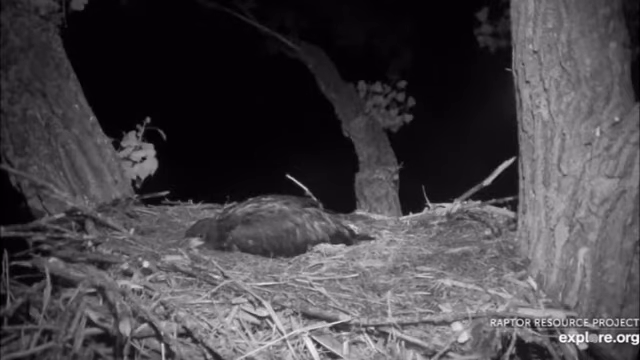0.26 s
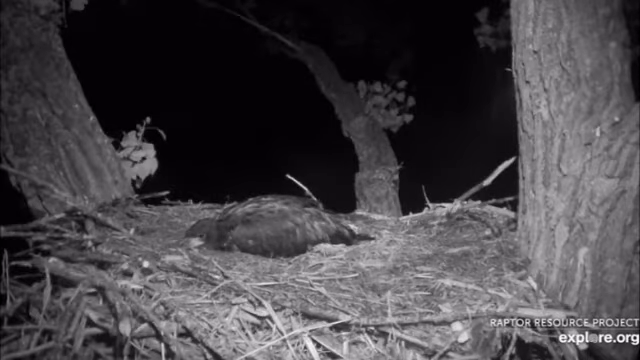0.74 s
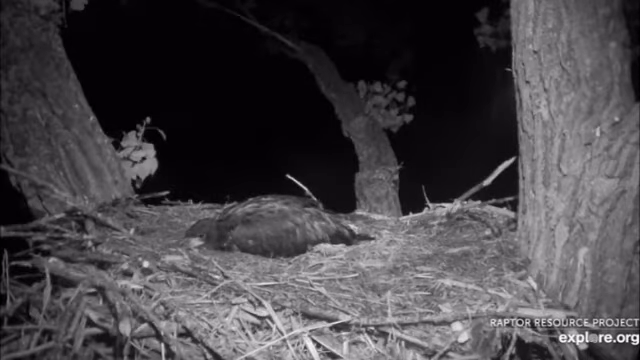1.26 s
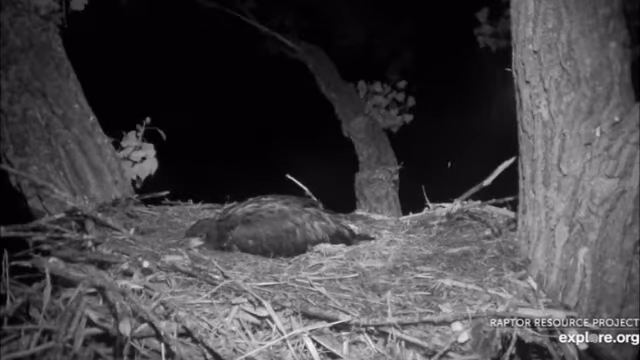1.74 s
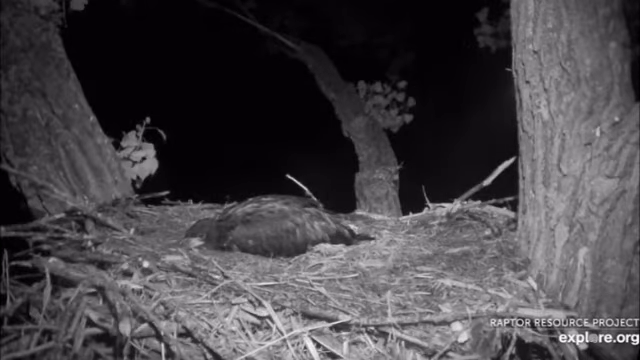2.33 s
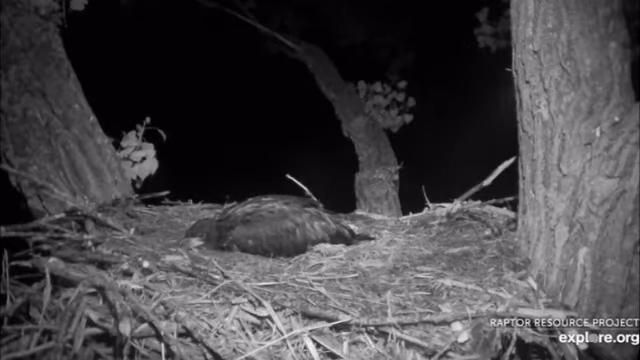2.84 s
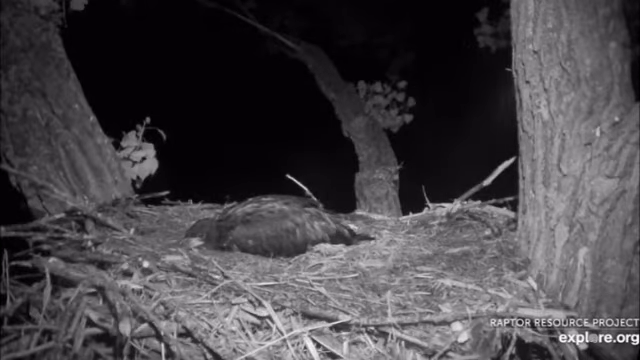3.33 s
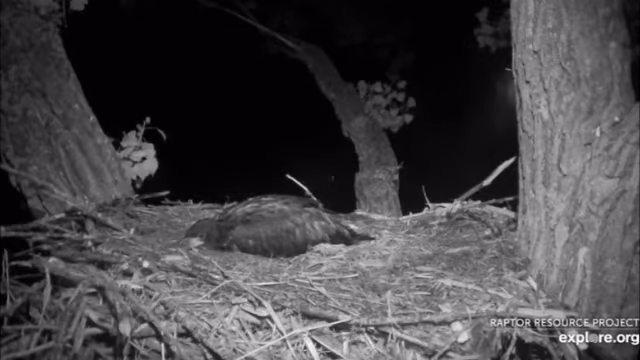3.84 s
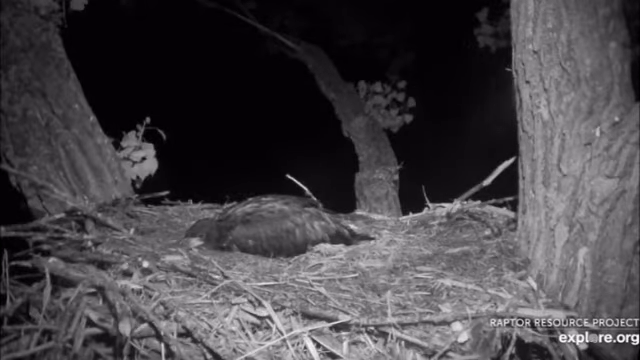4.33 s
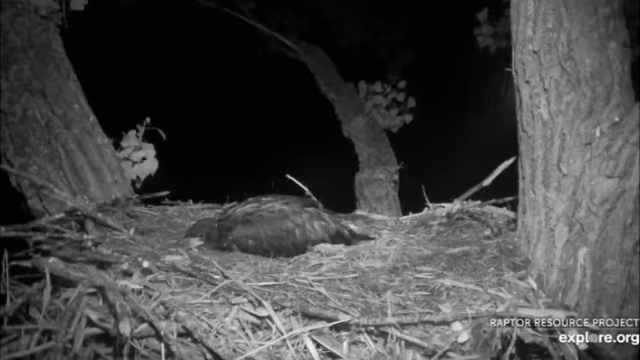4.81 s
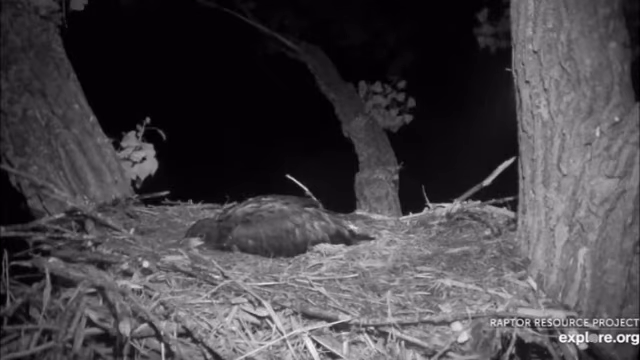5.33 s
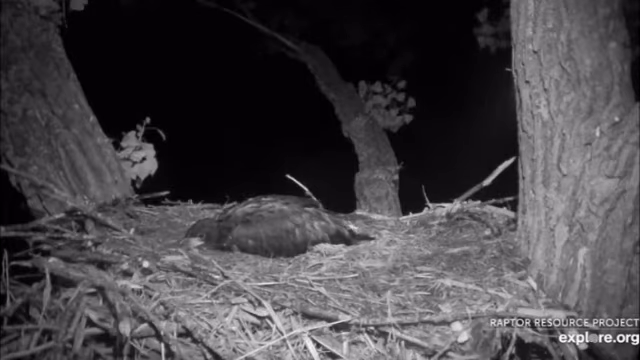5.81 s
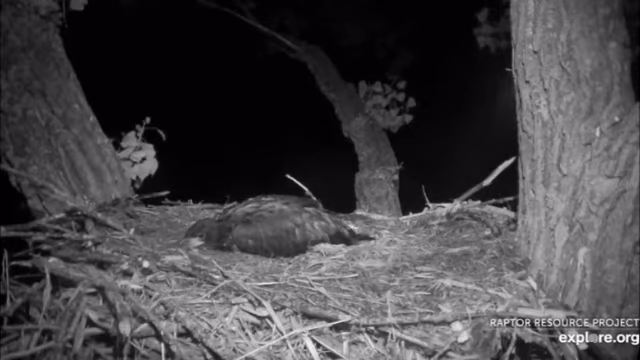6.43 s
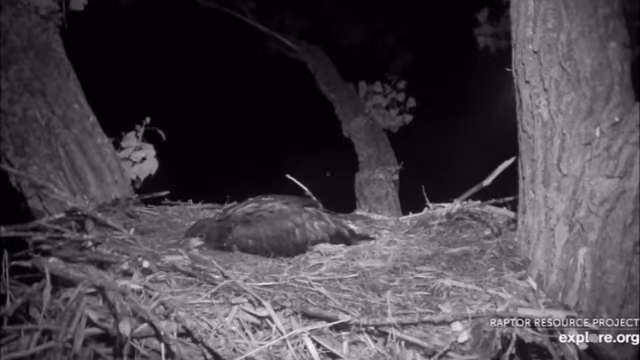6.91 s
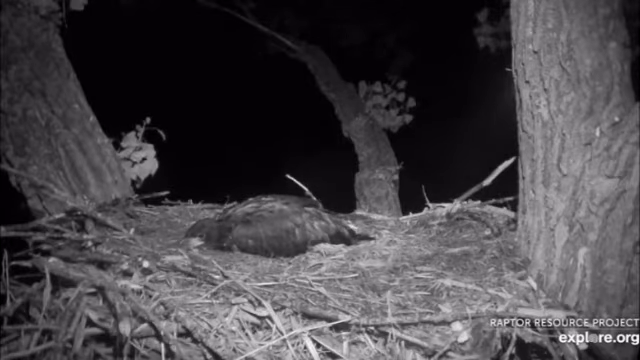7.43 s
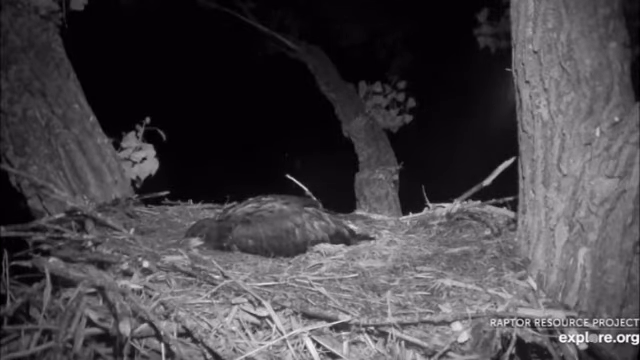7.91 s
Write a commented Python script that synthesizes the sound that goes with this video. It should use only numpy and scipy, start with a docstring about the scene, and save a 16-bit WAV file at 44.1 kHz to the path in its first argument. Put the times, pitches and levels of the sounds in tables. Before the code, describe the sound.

A dull weatherproof microphone high in a tree catches constant dark-toned rain. Big drops knock its casing in loud, low, damped thuds, sometimes paired or clustered, with gaps between; the hardest add a wet splash. Quieter drops patter and click on wood. Thin electronic hiss, a barely audible high whine and small regular ticks lie beneath. Late on, a soft thunder-like roll rises and ebbs. The nesting bird is not heard.

```python
"""A hard thump on the microphone housing, then steady night rain all around a stick nest high in a tree.
A dull weatherproof camera microphone picks it up: noise for the far wash and the patter on nest and bark,
damped notes for sticks, shaped knocks for drops on housing and close wood, and soft blows for a late rumble.
The camera adds hiss, crackle, a thin whine and a tick about every two seconds; its gain control ducks after
the hardest thumps, and a low-pass filter dulls the top."""
import sys
import numpy as np
from scipy import signal
from scipy.fft import rfft, irfft
from scipy.io import wavfile

SR = 44100
rng = np.random.default_rng(int(sys.argv[2]) if len(sys.argv) > 2 else 0)


def to_wav(s):
    """Save 16-bit WAV."""
    ch = np.atleast_2d(s).T  # columns
    pcm = np.round(np.clip(ch, -1, 1) * 32767)  # PCM
    wavfile.write(sys.argv[1], SR, pcm.astype(np.int16))


N = 359856  # samples, about 8.2 s


def gain_of(db):
    """Decibels to an amplitude factor."""
    return 10 ** (np.asarray(db) / 20)


def evened(x):
    """Scales a signal to rms 1."""
    return x / np.sqrt(np.mean(x ** 2) + 1e-20)


def read(points, hz):
    """Reads a spectrum in dB, interpolated along a log-frequency axis."""
    f, value = np.transpose(points)
    return np.interp(np.log(hz + 1), np.log(f + 1), value)


def add(mix, s, sound):
    """Mixes a sound in at time s [s], cut off at the end of the mix."""
    part = mix[max(round(s * SR), 0):][:len(sound)]
    part += sound[:len(part)]


def coloured(x, spectrum):
    """Filters a signal by a spectrum, then scales it to rms 1."""
    hz = np.fft.rfftfreq(N, 1 / SR)
    return evened(irfft(rfft(x) * gain_of(read(spectrum, hz)), N))


def knock(spectrum, stretch=1, ring=1, size=4096):
    """Minimum-phase response of a struck body, envelope peak 1; stretch shifts its pitch, ring sharpens it."""
    hz = abs(np.fft.fftfreq(size, 1 / SR))
    log_gain = np.log(gain_of(ring * read(spectrum, hz / stretch)))
    # the Hilbert transform of the log gain supplies the phase that makes the response causal
    response = np.fft.ifft(np.exp(np.conj(signal.hilbert(log_gain)))).real
    envelope = abs(signal.hilbert(response))
    return response[:size // 2] / envelope.max()


def drops(per_s, spread_db, largest=4):
    """Impacts of either sign at random moments: many small, a few large."""
    chance = rng.random(N)
    size = rng.exponential(1, N)
    sign = rng.choice([-1, 1], N)
    level = gain_of(spread_db * np.minimum(size, largest))
    return (chance < per_s / SR) * sign * level


def drift(per_s):
    """A slow random wander of rms 1, rolled off above per_s [Hz]."""
    hz = np.fft.rfftfreq(N, 1 / SR)
    lowpass = (hz > 0) / (1 + (hz / per_s) ** 4)
    return evened(irfft(rfft(rng.standard_normal(N)) * lowpass, N))


# colour of the far rain all around the tree: (frequency [Hz], relative level [dB per Hz])
WASH = [(20, -53), (50, -46), (95, -31), (156, -10.5), (290, 1), (500, -5.5), (740, -15), (1170, -19.5),
        (1850, -29), (2080, -35), (3200, -44.5), (4000, -47.5), (5300, -45), (6500, -57.5)]
# colour of nearer drops on nest and bark: (frequency [Hz], relative level [dB per Hz])
PATTER_COLOUR = [(20, -60), (60, -47), (150, -10), (290, 1.5), (480, -4.5), (720, -14), (1250, -23.5),
                 (2100, -40.5), (3500, -45), (6500, -74.5)]


def rain(ring_s=.0035, count=24):
    """Countless far drops merge into a wavering wash; nearer ones patter on patches of nest and bark."""
    waver_db = 0.6 * drift(per_s=11)
    far = gain_of(-37.5) * coloured(rng.standard_normal(N), WASH) * gain_of(waver_db)
    near, t = np.zeros(N), np.arange(SR // 30) / SR
    for _ in range(count):
        # each patch rattles briefly, with a colour of its own
        patch = rng.standard_normal(len(t)) * np.exp(-t / ring_s)
        near += signal.oaconvolve(drops(per_s=18, spread_db=2.5), patch)[:N]
    return far + gain_of(-38.5) * coloured(near, PATTER_COLOUR)


def sticks(count=20):
    """Each stick gives its own brief, damped note when hit, balanced by the colour of the wash."""
    t, out = np.arange(SR // 20) / SR, np.zeros(N)
    for hz in np.geomspace(330, 3000, count):
        cycles = hz * rng.uniform(0.917, 1.04) * t
        # attack and decay last a set number of cycles, so higher notes are shorter
        envelope = np.exp(-cycles / 2.9) * (1 - np.exp(-cycles / .7))
        note = np.sin(2 * np.pi * cycles) * envelope
        struck = evened(signal.oaconvolve(drops(per_s=20, spread_db=2.0), note)[:N])
        out += gain_of(read(WASH, hz)) * np.sqrt(hz) * struck
    return gain_of(-44.0) * evened(out)


# colour of the low rumble: (frequency [Hz], relative level [dB per Hz])
RUMBLE_COLOUR = [(20, -44), (50, -36), (80, -26), (130, -5.5), (210, 0), (290, 1), (380, -7.5),
                 (600, -20.5), (2000, -78.5)]
# it idles, swells once to a crest and ebbs
IDLE_DB, CREST_S, CREST_DB = -53, 7.6, -29
RISE_DB_PER_S, EBB_DB_PER_S = 9.5, 8


def rumble():
    """A lumpy low roll, like far thunder, made of scattered soft blows."""
    t = np.arange(N) / SR - CREST_S
    swell_db = CREST_DB + np.minimum(RISE_DB_PER_S * t, -EBB_DB_PER_S * t)
    level = np.hypot(gain_of(IDLE_DB), gain_of(swell_db))
    return level * coloured(drops(per_s=500, spread_db=2.0), RUMBLE_COLOUR)


# colour of the microphone's hiss: (frequency [Hz], relative level [dB per Hz])
HISS_COLOUR = [(20, -2), (3000, -0.5), (6500, -4.5), (8500, -1.5), (11000, -0.5), (14000, 2.5)]
# ticks of the camera's electronics, all equally loud: time [s]
TICK_TIMES = [1.2967, 3.2066, 5.2066, 7.2066]
# colour of one tick, also used for the crackle: (frequency [Hz], relative level [dB])
TICK_COLOUR = [(500, -20), (6500, -8), (8200, -1), (10300, 1), (11300, 6.5), (12300, -3.5), (14000, -7)]
TICK_START_DB, TICK_STOP_DB, TICK_PULSE_S = -43.5, -39.5, .00056
WHINE_HZ = 11073


def electronics():
    """Camera noise: gently wavering hiss, faint crackle, a whine of wandering pitch and a regular tick."""
    waver_db = .25 * drift(per_s=18)
    hiss = gain_of(-69.5) * coloured(rng.standard_normal(N), HISS_COLOUR) * gain_of(waver_db)
    click = knock(TICK_COLOUR)
    crackle = gain_of(-84.5) * evened(signal.oaconvolve(drops(per_s=25, spread_db=3.5), click)[:N])
    whine_hz = WHINE_HZ + 9 * drift(per_s=21)
    whine = gain_of(-85.0) * np.sqrt(2) * np.sin(2 * np.pi * np.cumsum(whine_hz) / SR)
    ticks = np.zeros(N)
    for s in TICK_TIMES:
        # a brief pulse of current clicks as it starts and again as it stops
        add(ticks, s, gain_of(TICK_START_DB) * click)
        add(ticks, s + TICK_PULSE_S, -gain_of(TICK_STOP_DB) * click)
    return hiss + crackle + whine + ticks


# heavy drops right on the microphone housing, before the gain control:
# (time [s], peak level [dB], pitch [Hz], ring [1 = plain, more = narrower and longer])
THUMPS = [(0.015,-6.5,181,1), (.403,-8.5,162,1.6), (.522,-19,175,1), (.598,-21.5,173,1.5),
          (0.9621,-15,171,1.35), (0.975,-21,150,1.04), (1.3161,-5.5,196,1.2), (1.3893,-11,176,1.75),
          (1.833,-6,197,1.7), (3.0923,-24.5,172,0.92), (3.114,-26,151,1.3), (3.309,-0.5,193,1.4),
          (3.9803,-5,162,1.18), (4.362,-18.5,214,1.24), (4.384,-22,218,1.25), (5.2028,-6.5,202,1.22),
          (5.2252,-16,192,1.7), (5.387,-16.5,177,2), (5.534,-15.5,180,1.7), (5.599,-20,216,1.75),
          (5.9703,-6.5,338,1.5), (5.9735,-21,140,1.7), (6.7345,-12,203,1.14), (7.0727,-24,173,1.3),
          (7.1207,-7.5,185,1.2), (7.1437,-10,223,1.23), (7.160,-13,151,1.23), (7.4386,-4.5,191,1.56),
          (7.688,-21,147,2)]
# how the housing answers a drop: (frequency [Hz], relative level [dB])
HOUSING_RESPONSE = [(20, -37.5), (50, -35), (70, -25), (100, -11), (140, -2.5), (190, 2), (260, -2),
                    (340, -9), (450, -20), (700, -31), (1500, -57), (5000, -70.5)]
HOUSING_HZ = 190  # where that response is loudest
TAPS_PER_S, TAPS_DB, TAPS_SPREAD_DB = 24, -46, 1  # light drops: total rate, rms level, spread


def housing(count=4):
    """Heavy drops thump the housing, each at its own pitch; light ones keep tapping it at random."""
    out, light = np.zeros(N), np.zeros(N)
    for s, db, hz, ring in THUMPS:
        add(out, s, gain_of(db) * knock(HOUSING_RESPONSE, hz / HOUSING_HZ, ring))
    for stretch in np.geomspace(.85, 1.25, count):
        tap = knock(HOUSING_RESPONSE, stretch, ring=1.2)
        light += signal.oaconvolve(drops(TAPS_PER_S / count, TAPS_SPREAD_DB), tap)[:N]
    return out + gain_of(TAPS_DB) * evened(light)


# how wet wood answers a drop, also the colour of a splash: (frequency [Hz], relative level [dB])
SPLAT_RESPONSE = [(100, -34.5), (400, -3), (750, 4.5), (1000, 0.5), (1500, -3.5), (2200, -17.5),
                  (3500, -36.5), (7000, -41.5), (14000, -57.5)]
SPLAT_HZ = 1000  # nominal pitch of that response, unshifted
# smack and spray levels are for a 0 dB thump; SPLASH_GROWTH is splash dB per thump dB
SPLASH_LAG_S, SPLASH_GROWTH = .0047, 2.5
SPLASH_DB, SPLASH_HZ = -22, 750
SPRAY_DB, SPRAY_HZ = -39, 2000


def splashes():
    """Just after landing, a heavy drop bursts in a wet smack and finer spray, far weaker on softer hits."""
    out = np.zeros(N)
    smack = gain_of(SPLASH_DB) * knock(SPLAT_RESPONSE, SPLASH_HZ / SPLAT_HZ)
    spray = gain_of(SPRAY_DB) * knock(SPLAT_RESPONSE, SPRAY_HZ / SPLAT_HZ, ring=.7)
    burst = smack + spray
    for s, db, _, _ in THUMPS:
        add(out, s + SPLASH_LAG_S, gain_of(SPLASH_GROWTH * db) * burst)
    return out


# the loudest drops on sticks close to the microphone: (time [s], peak level [dB], nominal pitch [Hz])
SPLATS = [(.3098, -29, 646), (.9222, -33, 680), (2.3431, -25, 640), (2.6522, -29, 700), (3.3368, -44, 2000),
          (5.204, -34, 1600), (5.2786, -27, 653), (5.9708, -23, 730), (6.081, -24, 670), (7.868, -29, 650)]
# fainter ones at random, on sticks spaced over a range of nominal pitches
STRAYS_PER_S, STRAY_DB, STRAY_DB_PER_OCTAVE = 6.5, -37, -9
STRAY_LOW_HZ, STRAY_HIGH_HZ = 625, 2800


def splats(count=6):
    """Short smacks of drops on the closest sticks; among the random ones, thin twigs sound higher and weaker."""
    out = np.zeros(N)
    for s, db, hz in SPLATS:
        add(out, s, gain_of(db) * knock(SPLAT_RESPONSE, hz / SPLAT_HZ))
    for hz in np.geomspace(STRAY_LOW_HZ, STRAY_HIGH_HZ, count):
        stray_db = STRAY_DB + STRAY_DB_PER_OCTAVE * np.log2(hz / STRAY_LOW_HZ)
        smack = gain_of(stray_db) * knock(SPLAT_RESPONSE, hz / SPLAT_HZ)
        out += signal.oaconvolve(drops(STRAYS_PER_S / count, spread_db=0.4), smack)[:N]
    return out


def scene():
    """Everything, near and far, reaches one microphone."""
    mix = rain() + sticks() + rumble() + electronics() + housing() + splashes() + splats()
    return mix[None]


EDGE_HZ = 14130  # upper band limit


def record(dry, threshold_db=-5.5, recovery_s=0.2, attack_s=0.0051):
    """Gain control drops quickly on a peak and creeps back; then a steep low-pass limits the band."""
    over_db = np.maximum(20 * np.log10(abs(dry[0]) + 1e-9) - threshold_db, 0)
    # hold each peak's excess while it decays exponentially: a running maximum in the log domain
    fade = np.arange(N) / SR / recovery_s
    held_db = np.exp(np.maximum.accumulate(np.log(over_db + 1e-9) + fade) - fade)
    lag = np.exp(-1 / (attack_s * SR))
    cut_db = signal.lfilter([1 - lag], [1, -lag], held_db)
    ducked = dry / gain_of(cut_db)
    edge = signal.firwin(1023, EDGE_HZ, window=("kaiser", 9), fs=SR)
    return signal.oaconvolve(ducked, edge[None], "same")


dry = scene()
out = record(dry)
to_wav(out)
```